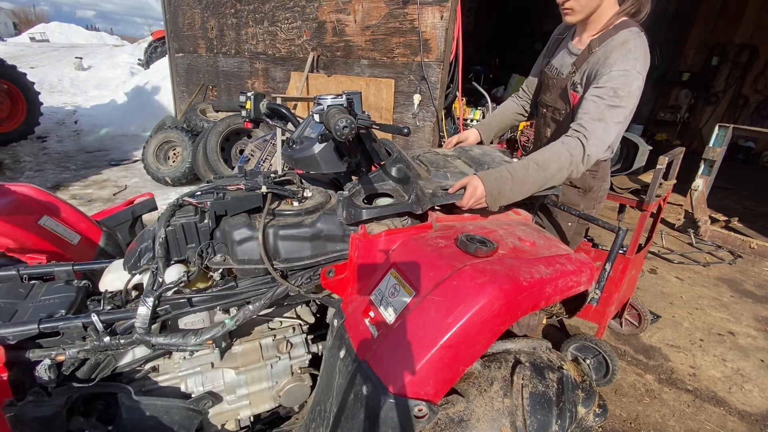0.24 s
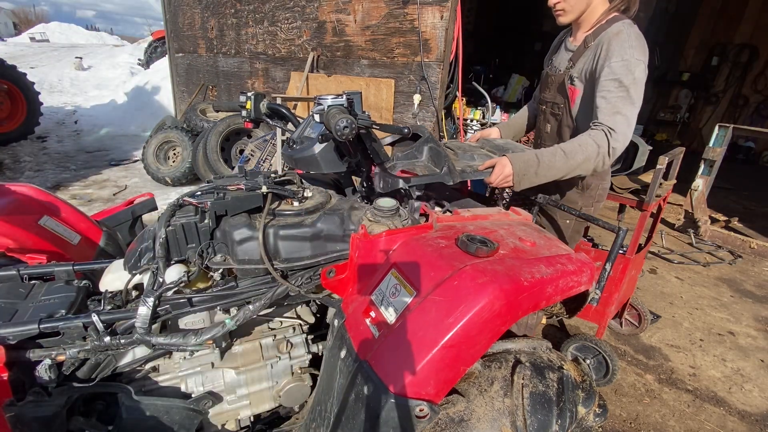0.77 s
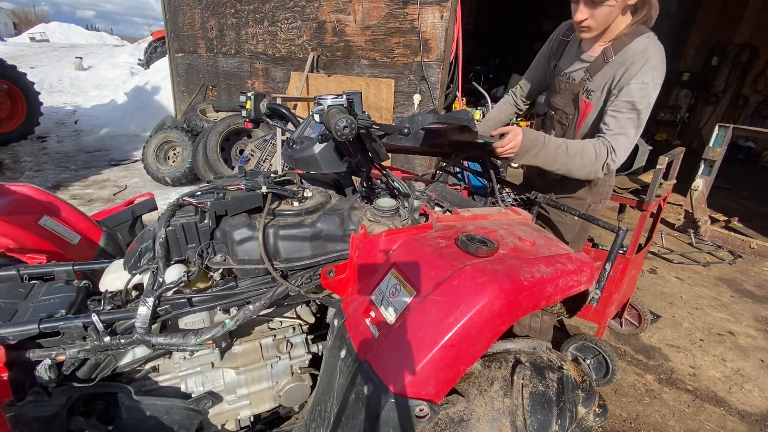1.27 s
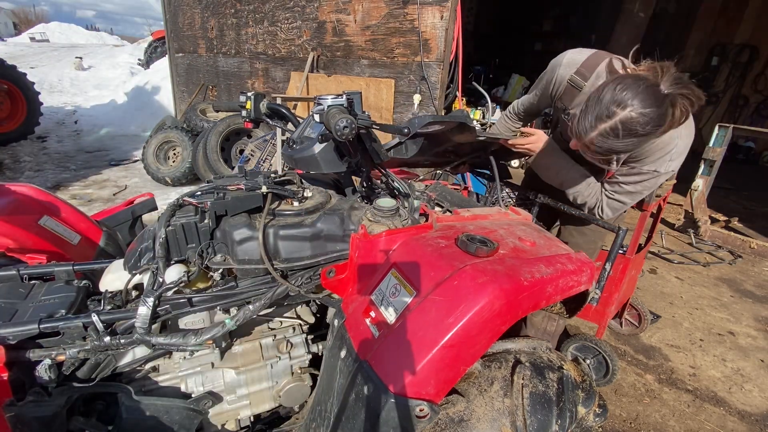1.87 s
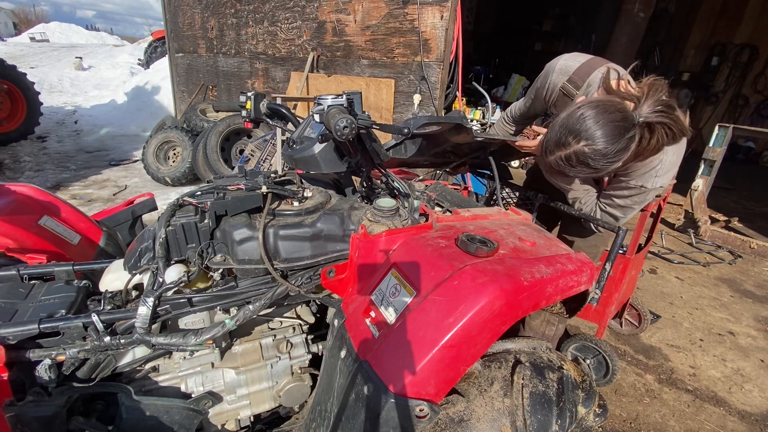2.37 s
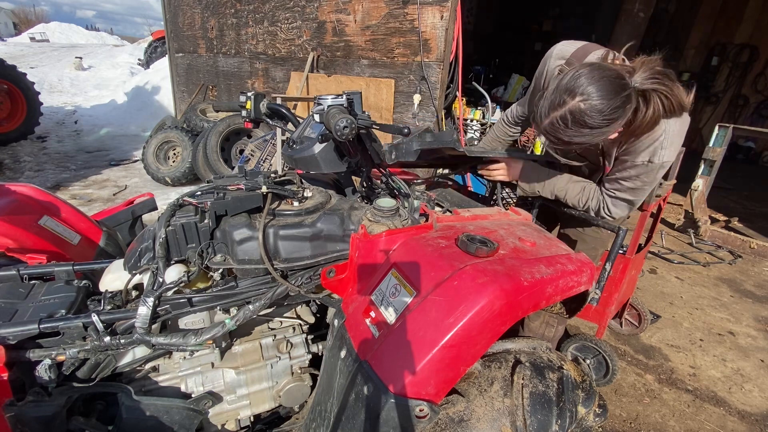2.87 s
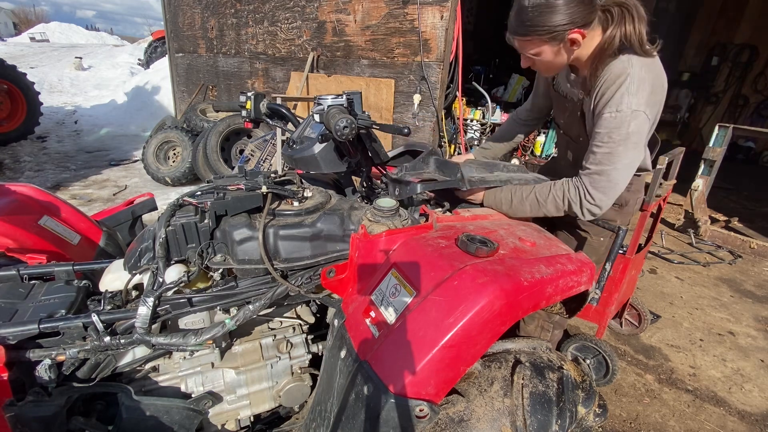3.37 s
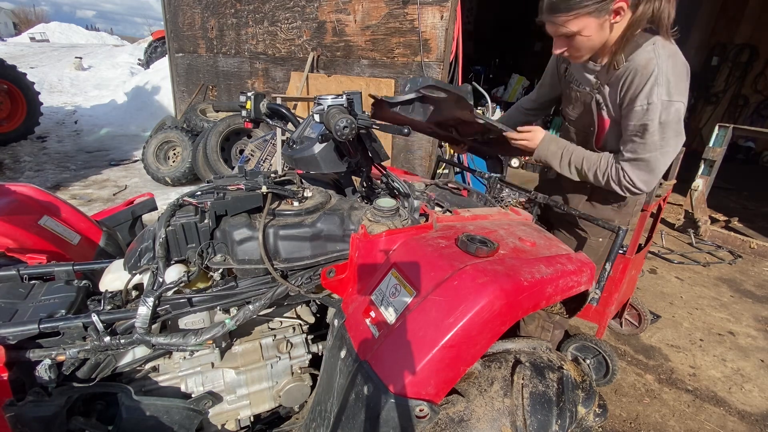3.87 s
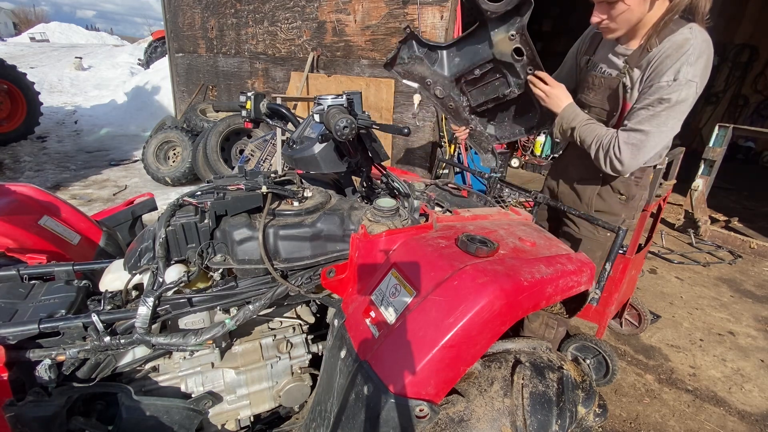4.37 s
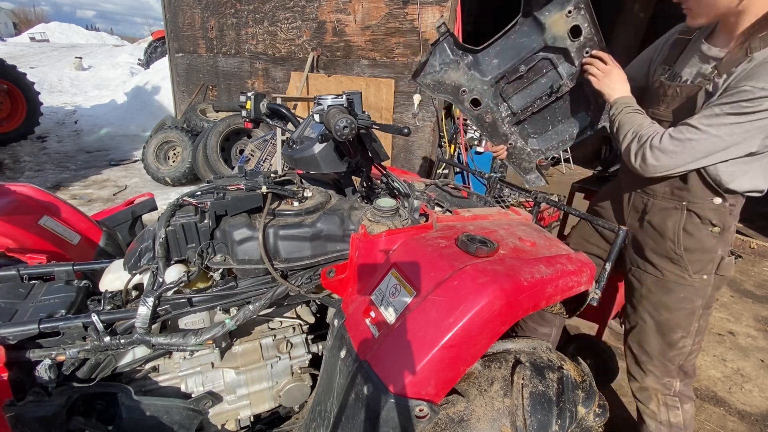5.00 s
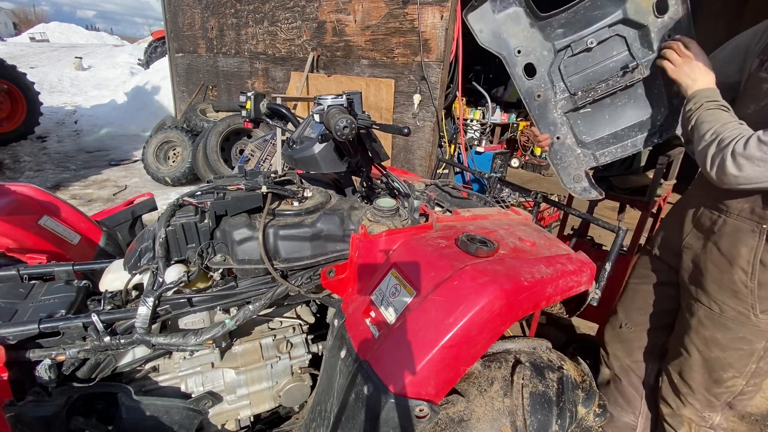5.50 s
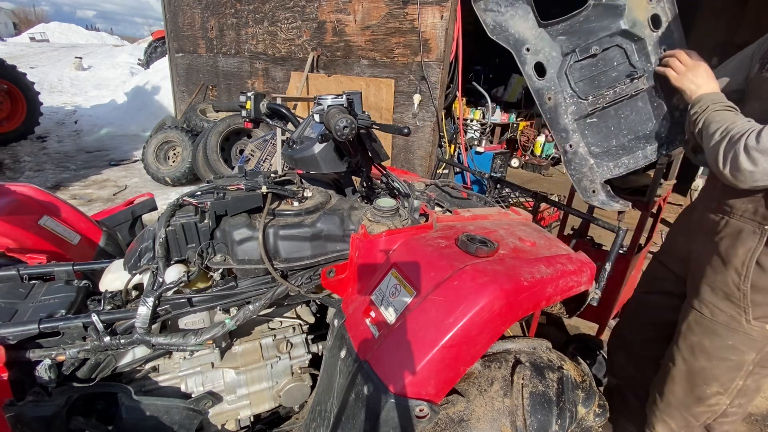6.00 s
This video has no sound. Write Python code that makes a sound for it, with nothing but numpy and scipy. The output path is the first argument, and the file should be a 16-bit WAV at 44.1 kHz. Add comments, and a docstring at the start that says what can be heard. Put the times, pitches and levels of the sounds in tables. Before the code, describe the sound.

Plastic bodywork clatters, scrapes and flexes as it is pried free, pauses, rattles again, then lifts away with sparse knocks and cloth brushes.

```python
"""A moulded plastic panel is worked loose from a quad bike and lifted away, outdoors beside an open shed.
It opens on squeaks and a swish of cloth; knocks, scrapes and thuds crowd the first 1.7 s, with a lull to 2.8 s.
A second spell of them follows; from 3.8 to 4.3 s the panel comes free, then sparser knocks and brushes remain.
Blows and drags ring its short-lived modes, bends are damped sines with noise, and cloth is dense grain noise.
Two microphone ports hear it from the side, with a faint shed echo, over a very quiet yard."""
import sys
import numpy as np
from scipy import signal
from scipy.fft import rfft, irfft
from scipy.io import wavfile
from scipy.ndimage import uniform_filter1d

SR = 44100
rng = np.random.default_rng(int(sys.argv[2]) if len(sys.argv) > 2 else 0)


def bounce(signal):
    """Save signal as a 16-bit WAV file at the path given by the first command-line argument."""
    frames = np.transpose(np.atleast_2d(signal))
    limited = np.clip(frames, -1, 1)
    pcm = np.round(limited * 32767).astype(np.int16)
    wavfile.write(sys.argv[1], SR, pcm)


N = 275625
T = np.arange(N) / SR

# hard contacts: (t/s, level at 500-2200 Hz/dB, body at 170-500 Hz relative to that/dB,
# edge above 2200 Hz relative to that/dB, ring time as a share of the panel's own, contact resonance f/Hz)
CONTACTS = [(0.093, -48.5, -2, -24, 3.6, 895), (0.172, -25, -8.5, -7.5, 0.33, 1300),
            (0.176, -30.5, -25, -22, 0.24, 546), (0.193, -37, 1.5, -7, 0.65, 513),
            (0.207, -39.5, -6, -2, 1.7, 1500), (0.339, -32.5, -11, -2.5, 1.2, 1210),
            (0.3525, -27.5, -2.5, -9.5, 0.86, 585), (0.377, -39, -25, -2, 1.3, 1520),
            (0.435, -41.5, -3, -19, 1.3, 714), (0.445, -37.5, -10, -9, 1.5, 695),
            (0.468, -42.5, -1.5, -25, 0.48, 1320), (0.601, -50, -14, 3.5, 0.78, 1900),
            (0.644, -50.5, 6.5, -10, 0.42, 1010), (0.685, -40, -14, -18, 0.44, 597),
            (0.697, -32, -3, -16, 1.9, 504), (0.796, -31, -10, -4.5, 0.74, 1110),
            (0.85, -48.5, -2, -16, 0.84, 1190), (0.957, -33.5, -9.5, -9.5, 0.67, 1040),
            (1.099, -49, -16, -20, 0.47, 730), (1.115, -43.5, 0, -8, 0.59, 740),
            (1.368, -21.5, -15, -8, 0.55, 920), (1.374, -34, 2, -9, 0.93, 460),
            (1.411, -43.5, -10, -5, 0.98, 1100), (1.539, -27, 1, -4, 0.66, 1370),
            (1.544, -29.5, -9, -16, 1, 610), (1.55, -34, -3, -9, 1.2, 650),
            (1.566, -41.5, 4, -20, 0.75, 563), (1.642, -40.5, 3, -19, 1.7, 780),
            (2.839, -42, -6, -4.5, 1.8, 1200), (2.876, -34, -6, -26, 2.2, 890),
            (2.92, -44, 2, 0, 2.3, 1400), (2.943, -39.5, -0.5, -13, 1.7, 1140),
            (3.003, -43, -2, -14, 0.74, 694), (3.154, -31.5, -16.5, -6.5, 1.05, 2820),
            (3.211, -41, -11, -14, 0.58, 1580), (3.221, -54, -13, -20, 0.27, 1270),
            (3.272, -39, -3, -15, 1, 1080), (3.287, -48, -11, -15, 0.7, 910),
            (3.395, -47.5, -6, -3, 0.42, 1480), (3.507, -50, -13, 4.5, 0.63, 3060),
            (3.567, -44, -0.5, -29, 1.5, 990), (3.702, -48, 2, -11, 1.44, 1300),
            (4.336, -60, -18, -2.5, 0.36, 1130), (4.631, -44.5, 1, -26, 1.2, 900),
            (4.717, -28.5, -4, -13.5, 0.52, 1000), (4.748, -34.5, -6.5, -16, 0.55, 1060),
            (4.939, -32.5, -9.5, -34, 1.8, 1010), (4.992, -40, -5, -11, 0.89, 1130),
            (5.0, -32.5, -14, -8, 1.1, 1610), (5.801, -46, 0.5, -10, 1.4, 700),
            (6.182, -36, -7.5, 1, 0.71, 1060)]
# spectral outline of cracking plastic: (f/Hz, level per Hz/dB)
CRACK_SPECTRUM = [(50, -12.5), (120, 5.5), (300, 5), (600, 5.5), (1300, 8), (2600, -2.5), (3800, -12),
                  (5000, -12), (5800, -26.5), (6700, -20), (11000, -40), (14000, -47.5)]


def undb(db):
    """Decibels to gain."""
    return 10 ** (np.asarray(db) / 20)


def unit(x):
    """Scale to rms 1."""
    return x / np.sqrt(np.mean(x ** 2))


def convolve(x, response):
    """Convolve along time, keeping the length of x."""
    return signal.fftconvolve(np.atleast_2d(x), np.atleast_2d(response), axes=-1)[:, :x.shape[-1]]


def colour(x, points):
    """Causal, minimum-phase filter with the given (f/Hz, level/dB) outline."""
    size = 4096
    hz, db = np.transpose(points)
    bin_hz = np.arange(size // 2 + 1) * SR / size
    log_gain = np.log(undb(np.interp(np.log(bin_hz + 1), np.log(hz), db)))
    # folding the cepstrum onto positive time makes the filter causal
    fold = 1 + np.sign(size // 2 - np.arange(size))
    fold[0] = 1
    return convolve(x, irfft(np.exp(rfft(irfft(log_gain) * fold))))


def band(x, hz, kind, order=3):
    """Butterworth filter."""
    return signal.sosfilt(signal.butter(order, hz, kind, fs=SR, output="sos"), x)


def favour(x, hz, db):
    """Lift one broad resonance."""
    peak = signal.lfilter(*signal.iirpeak(hz, 1.8, fs=SR), x)
    return x + (undb(db) - 1) * peak


def add(out, s, x):
    """Mix x into out at time s."""
    i = max(int(s * SR), 0)
    out[..., i:i + x.shape[-1]] += x[..., :N - i]


def fade(t, t60):
    """Exponential decay by 60 dB in t60 seconds."""
    return np.exp(-np.log(1000) * t / t60)


def walk(rate, size=N):
    """Smooth random wandering with a spread near 1, taking a new course rate times a second."""
    k = int(SR / rate)
    held = rng.standard_normal(size)[np.arange(size) // k]
    return uniform_filter1d(held, k)


def grains(n, per_s, spread_db):
    """Three streams of randomly timed slips; a positive spread makes a few large, a negative one a few small."""
    sizes = undb(spread_db * np.minimum(rng.exponential(size=(3, n)), 4))
    happens = rng.random((3, n)) < per_s / SR
    return unit(happens * sizes * rng.choice([-1, 1], (3, n)))


def ports(x, lag_ms, scatter_db, scatter_t60):
    """Sound reaches the left port first; nearby bodywork scatters a different burst to each port."""
    t = T[:SR // 8]
    burst = rng.standard_normal((2, len(t))) * fade(t, scatter_t60)
    response = undb(scatter_db) * unit(burst) / np.sqrt(len(t))
    response[0, 0] += 1
    response[1] += np.sinc((t - lag_ms / 1000) * SR)
    return convolve(x, response) / np.sqrt(1 + undb(2 * scatter_db))


def wide(streams, lag_ms, diffuse_db):
    """A broad source: the shared stream reaches the left port first, each port adds a stream of its own."""
    late = np.interp(T - lag_ms / 1000, T, streams[0])
    mix = np.array([streams[0], late]) + undb(diffuse_db) * streams[1:]
    return mix / np.sqrt(1 + undb(2 * diffuse_db))


def yard():
    """Still outdoor air: a quiet coloured noise whose level wanders slowly."""
    # yard noise outline: (f/Hz, level per Hz/dB)
    air_spectrum = [(30, -32), (60, -24), (100, -2.5), (200, 12.5), (400, -25.5), (1000, -2.5),
                    (2500, -9.5), (8000, -20), (12000, -26.5), (13500, -40)]
    level_db = -76
    air = unit(colour(rng.standard_normal((2, N)), air_spectrum))
    return undb(level_db) * air * undb(walk(0.56))


def shed(x):
    """A faint, dull echo from the open shed and its wall: x convolved with decaying noise."""
    t = T[:SR * 3 // 4]
    tail = rng.standard_normal((2, len(t))) * fade(t, 0.28) * (1 - fade(t, 0.0039))
    tail = colour(tail, [(100, -3.0), (900, -8.5), (3000, -8.5), (10000, -12)])
    return undb(-12.5) * convolve(x, unit(tail) / np.sqrt(len(t)))


def lifted():
    """0 while the panel lies on the machine, 1 once it is held in the air."""
    return np.clip((T - 3.8) / .5, 0, 1)


def work():
    """Working gains of rubbing and bending for every sample; each layer adds its own trim."""
    # how hard the panel is worked: (t/s, rubbing reference level/dB, bending reference level/dB)
    effort = [(0.0, -61, -101), (0.09, -56, -62), (0.36, -50, -57.5), (0.681, -54.5, -64),
              (1.18, -58.5, -57.5), (1.33, -58.5, -64), (1.39, -56, -99), (1.55, -51, -48),
              (1.81, -62, -66.5), (1.979, -76.5, -63), (2.25, -77.5, -82), (2.8, -65.5, -74),
              (2.99, -54.5, -57.5), (3.1, -55.5, -54), (3.52, -61.5, -56.5), (3.63, -70.5, -60.5),
              (3.74, -52.5, -60), (4.23, -83.5, -75.5), (4.53, -59, -92), (4.63, -58, -82),
              (5.12, -69, -73.5), (5.61, -76, -101), (5.71, -79, -70), (5.99, -62, -77), (6.25, -85, -92)]
    s, rub_db, bend_db = np.transpose(effort)
    return undb(np.interp(T, s, rub_db)), undb(np.interp(T, s, bend_db))


def clothes():
    """Coarse fibres brush past each other; every sweep swells and falls away, over a faint rustle."""
    # a sleeve or trouser leg sweeps past: (middle t/s, length/s, level/dB, sheen above 6 kHz relative/dB)
    sweeps = [(0.0, 0.053, -57.5, -11), (0.244, 0.32, -61.5, -2), (0.432, 0.14, -68, 1),
              (0.627, 0.18, -62, 0), (0.746, 0.064, -62.5, 1.5), (0.956, 0.019, -47.5, -10),
              (1.11, 0.098, -59.5, -2), (1.219, 0.074, -61, 0), (1.473, 0.28, -58.5, 2),
              (1.704, 0.34, -67, -3), (2.343, 0.4, -61, -0.5), (2.622, 0.28, -76, -7),
              (2.78, 0.1, -58, -0.5), (2.86, 0.17, -57, 0), (2.923, 0.1, -54, -3.5),
              (2.986, 0.051, -55.5, -6), (3.086, 0.14, -56, 4), (3.198, 0.34, -58, 0),
              (3.501, 0.28, -62.5, 1), (3.654, 0.066, -61.5, -9), (3.718, 0.067, -57, 1),
              (3.75, 0.094, -58.5, 2.5), (3.838, 0.31, -69.5, 1), (4.07, 0.42, -69, -3),
              (4.371, 0.12, -76, 1), (4.57, 0.19, -57, -5.5), (4.71, 0.21, -61, -6),
              (4.988, 0.24, -62, -1.5), (5.338, 0.17, -70.5, -3.5), (5.5, 0.062, -58.5, 0),
              (5.543, 0.08, -60.5, 3), (5.764, 0.37, -64.5, 4), (5.952, 0.11, -54, -5),
              (6.085, 0.4, -51, 0), (6.197, 0.44, -55.5, 0)]
    # cloth outline: (f/Hz, level per Hz/dB)
    cloth_spectrum = [(50, -30.5), (130, 1), (300, 0.5), (1100, 4.5), (2000, -3), (3200, 1.5), (4800, 2.5),
                      (5700, -6), (6700, 2.5), (7700, -8), (8400, -0.5), (10800, -4), (12300, -10),
                      (13400, -33.5), (15500, -19)]
    rustle_db = -16.5  # clothes stir with the work, relative to the rubbing reference
    edge_db = -28.5  # level half a length from the middle of a sweep, against its middle
    power = np.tile((work()[0] * undb(rustle_db)) ** 2, (2, 1))
    for s, length, db, sheen_db in sweeps:
        near = np.abs(T - s) < length
        sweep_db = db + edge_db * (2 * (T[near] - s) / length) ** 2
        power[:, near] += undb([sweep_db, sweep_db + sheen_db]) ** 2
    fibres = grains(N, per_s=4500, spread_db=3.3) * undb(2.5 * walk(80))
    cloth = unit(colour(fibres, cloth_spectrum))
    dull = band(cloth, 6000, "low") * np.sqrt(power[0])
    sheen = band(cloth, 6000, "high") * np.sqrt(power[1])
    swish = dull + sheen
    return swish[1:] + ports(swish[0], lag_ms=0.0048, scatter_db=11.0, scatter_t60=0.046)


def frame_ring():
    """A bumped steel part sings on faintly and unevenly; its upper mode dies first."""
    # bumps on the steel frame: (t/s, level/dB, f/Hz of the part that is hit, ring time t60/s)
    bumps = [(1.55, -47, 721, 0.49), (4.717, -78, 1040, .7), (4.94, -67, 840, 1.96)]
    modes = [(1, 0, 1), (3.2, -15, 0.42)]  # (pitch ratio, level/dB, share of the ring time)
    out, t = np.zeros(N), T[:SR]
    for s, db, hz, t60 in bumps:
        for ratio, mode_db, share in modes:
            phase = 2 * np.pi * hz * ratio * t
            shimmer = walk(60, size=SR) * np.sin(phase) + walk(60, size=SR) * np.cos(phase)
            add(out, s, undb(db + mode_db) * fade(t, t60 * share) * shimmer)
    return out


def ticks():
    """Grit snaps under an edge as short bright noise, too lightly to ring the panel."""
    # tiny bright ticks of grit on the plastic: (t/s, peak level/dB)
    grit_snaps = [(0.614, -46), (0.793, -50), (1.278, -48.5), (2.835, -49), (3.511, -47), (3.701, -51),
                  (4.794, -45), (5.043, -61)]
    out, t = np.zeros(N), T[:SR // 20]
    for s, db in grit_snaps:
        snap = band(rng.standard_normal(len(t)), [3000, 10000], "band") * fade(t, 0.018)
        add(out, s, undb(db) * snap / np.abs(snap).max())
    return ports(out, lag_ms=.2, scatter_db=-4, scatter_t60=.02)


def crackle():
    """Dust under the sliding edge breaks in tiny, separate snaps until the panel is lifted."""
    # dust outline: (f/Hz, level per Hz/dB)
    dust_spectrum = [(300, -20), (900, 5), (2600, 1), (4800, -1.5), (5800, -14.5), (7000, -10),
                     (11000, -24), (14000, -35)]
    level_db = -12.5  # relative to the rubbing reference
    snaps = unit(colour(grains(N, per_s=220, spread_db=2.5), dust_spectrum))
    return wide(snaps * work()[0] * undb(level_db) * (1 - lifted()), lag_ms=0.14, diffuse_db=-6)


def chatter():
    """Loose edges tick against the frame at random while the panel still lies on it."""
    level_db = -8.5  # relative to the rubbing reference
    taps = unit(colour(grains(N, per_s=45, spread_db=-5.5), CRACK_SPECTRUM))
    return wide(taps * work()[0] * undb(level_db) * (1 - lifted()), lag_ms=0.41, diffuse_db=12.5)


def squeaks():
    """An edge's slips fall into a brief rhythm, heard as a tone, some steady and some wavering."""
    # squeaking edge: (t/s, length/s, start f/Hz, end f/Hz, level/dB, waver as a share of the pitch)
    squeak_table = [(0.0, 0.071, 3910, 3930, -64, 0.011), (0.0, 0.08, 4250, 4450, -68, 0.017),
                    (0.0, 0.06, 3570, 3570, -84, 0.011), (0.0, 0.21, 487, 463, -55, 0.052),
                    (0.266, 0.045, 3200, 3180, -54, .004), (0.262, 0.044, 4270, 4080, -57, 0.0061),
                    (3.193, 0.049, 762, 753, -45, .015), (3.2, 0.032, 1546, 1395, -41, 0.04),
                    (3.338, 0.072, 1143, 1185, -51.5, 0.015), (3.32, 0.048, 1564, 1800, -60, .012),
                    (3.482, 0.049, 1210, 1260, -52.5, .015), (5.929, 0.055, 1250, 1290, -52, 0.06),
                    (6.052, 0.049, 1140, 996, -55, 0.026)]
    out = np.zeros(N)
    for s, length, start_hz, end_hz, db, waver in squeak_table:
        n = int(length * SR)
        hz = np.linspace(start_hz, end_hz, n) * (1 + waver * walk(500, size=SR)[:n])
        grip = np.hanning(n) ** .5 * undb(3 * walk(150, size=SR)[:n])
        add(out, s, undb(db) * grip * np.sin(2 * np.pi * np.cumsum(hz) / SR))
    return ports(out, lag_ms=.04, scatter_db=-8, scatter_t60=.03)


def flexing():
    """The sheet gives way in soft, heavily damped thuds and rumbles under the hands."""
    # thuds of the flexing sheet: (t/s, peak level/dB, f/Hz)
    thuds = [(0.171, -47, 85), (0.232, -39, 190), (0.282, -32, 360), (0.568, -42, 234), (0.696, -43, 74),
             (0.861, -40.5, 115), (1.072, -38.5, 85), (1.098, -45.5, 171), (1.154, -35.5, 84),
             (1.304, -37.5, 117), (1.338, -36.5, 183.5), (1.549, -33, 244), (1.6, -40, 127),
             (1.685, -34.5, 193), (1.728, -42.5, 148), (1.93, -48.5, 105), (2.027, -52, 130),
             (2.086, -43.5, 220), (2.239, -53.5, 135), (2.43, -49.5, 121), (3.004, -37.5, 239),
             (3.23, -37, 173), (3.285, -34, 318), (3.312, -34.5, 282), (3.413, -41, 208), (3.554, -39, 262),
             (3.584, -39, 286), (3.674, -39.5, 162), (3.747, -43, 310), (3.886, -47, 202),
             (4.107, -52, 156), (4.217, -59, 152), (4.248, -51, 143), (4.281, -64.5, 186),
             (4.298, -50, 287), (5.687, -64, 161), (5.83, -58, 173), (6.182, -41, 206)]
    # rumble outline: (f/Hz, level per Hz/dB)
    rumble_spectrum = [(25, -35.5), (45, -14), (75, 4.5), (130, 6), (240, 0), (350, -22), (600, -34),
                       (2000, -55)]
    rise_cycles, thud_t60, shudder_db = 5.4, 0.079, -3  # a low bend takes longer to swell than a high one
    shift_rad, shift_hz = 2.2, 101  # ports are this far out of step at this pitch, less at higher ones
    rumble_db = -2.5  # relative to the bending reference
    out, t = np.zeros((2, N)), T[:SR // 6]
    for s, db, hz in thuds:
        # one bending mode leads, its crowded neighbours shudder along
        shudder = unit(band(rng.standard_normal((2, len(t))), [hz * .6, hz * 1.9], "band", order=2))
        lag_rad = np.array([[0], [shift_rad * shift_hz / hz]])
        mode = np.sin(2 * np.pi * hz * t - lag_rad)
        swell = (1 - fade(t, rise_cycles / hz)) ** 2 * fade(t, thud_t60)
        swing = swell * (mode + undb(shudder_db) * shudder)
        add(out, s, undb(db) * swing / np.abs(swing).max())
    rumble = unit(colour(grains(N, per_s=55, spread_db=3.0), rumble_spectrum))
    return out + wide(rumble * work()[1] * undb(rumble_db), lag_ms=0.74, diffuse_db=12.0)


def panel_ring(share):
    """The panel's modes as decaying sines; contact and grip shift their weights and pitches at random."""
    # modes before those shifts: (f/Hz, level/dB, t60/s for a share of 1)
    modes = [(255.7, -4, 0.086), (349, -3.5, 0.088), (441.3, -0.5, 0.054), (542, -3, 0.06),
             (648, -3, 0.058), (726, -10, 0.18), (937, -7.5, 0.14), (1094, -0.5, 0.048),
             (1290, -4.5, 0.065), (1537, 4.5, 0.023), (1735, -11, 0.15), (2580, 0, 0.0088),
             (2995, -13.5, 0.064), (4230, -25, 0.067)]
    t = T[:SR // 4]
    hz, db, t60 = np.transpose(modes)[:, :, None]
    weight, detune, side = rng.standard_normal((3, len(modes), 1))
    waves = np.sin(2 * np.pi * hz * (1 + 0.025 * detune) * t)
    gain = np.sign(side) * undb(db + 0.92 * weight)
    return np.sum(gain * waves * fade(t, t60 * share), axis=0)


def rubbing(n):
    """Dusty edges stick and slip in uneven runs, shaking the panel; its ring shifts as the contact moves."""
    # gritty contact outline: (f/Hz, level per Hz/dB)
    grit_spectrum = [(50, -45), (130, -2), (270, 7.5), (500, 6), (790, 5), (1100, -15), (1700, -8),
                     (2500, -12.5), (4500, -23.5), (6000, -39), (12000, -63.5)]
    slips = grains(n, per_s=800, spread_db=3.7) * undb(3 * walk(70, size=n))
    # the moving point of contact wanders between two sets of mode weights
    place = walk(7, size=N)[:n] * np.pi / 2
    ring_a = convolve(slips, panel_ring(.65))
    ring_b = convolve(slips, panel_ring(.65))
    ring = np.cos(place) * ring_a + np.sin(place) * ring_b
    return unit(unit(colour(slips, grit_spectrum)) + unit(ring))


def scrape():
    """Each drag, and the skid after each blow, catches and lets go; light rubbing goes on between."""
    # single drags over frame and overalls: (t/s, length/s, level below 2200 Hz at full force/dB,
    # brightness above 2200 Hz relative to that/dB, contact resonance f/Hz)
    drags = [(0, 0.015, -44.5, -11.5, 494), (0.153, 0.048, -41.5, -7, 950), (0.265, 0.034, -48, -5.5, 3320),
             (0.43, 0.046, -42, -15, 736), (0.5, 0.081, -48.5, -4, 1210), (0.586, 0.042, -47.5, -5, 1100),
             (0.672, 0.014, -49.5, -4, 516), (0.739, 0.025, -43.5, -12, 487),
             (0.829, 0.12, -55, -4.5, 1040), (1.12, 0.018, -45.5, -16, 890), (1.2, 0.03, -47.5, -10, 1040),
             (1.459, 0.088, -49.5, -10.5, 900), (1.512, 0.025, -48, -10, 960),
             (1.63, 0.023, -44, -15.5, 353), (2.06, 0.071, -66, -10.5, 980), (2.26, 0.069, -71, 8.5, 1100),
             (2.76, 0.087, -57, -13, 890), (2.895, 0.034, -46, -11, 990), (2.984, 0.03, -45.5, -24, 720),
             (3.075, 0.075, -47.5, -33, 970), (3.185, 0.023, -44.5, -5.5, 2750),
             (3.266, 0.021, -42.5, -18.5, 270), (3.389, 0.085, -55.5, -10, 1240),
             (3.465, 0.058, -52.5, -9, 3030), (3.7, 0.04, -49.5, -15, 484), (3.82, 0.042, -64, 0, 810),
             (4.04, 0.12, -63.5, -9, 1000), (4.475, 0.18, -51.5, -32, 1100),
             (4.636, 0.07, -50.5, -23, 1180), (4.935, 0.051, -43.5, -26, 503),
             (4.988, 0.022, -39.5, -9.5, 1830), (5.275, 0.081, -55, -8.5, 820),
             (5.46, 0.051, -55.5, -8.5, 296), (5.655, 0.16, -57.5, -2, 4330),
             (5.893, 0.056, -46.5, -13.5, 1140), (6.031, 0.07, -59, 3, 2550),
             (6.171, 0.014, -47.5, -2.5, 2500)]
    rub_db = -3.5  # relative to the rubbing reference
    skid_delay_s, skid_s, skid_db, skid_bright_db = .012, 0.023, -58, -22
    blow_db, skid_growth = -36, 0.3  # skid_db holds for this blow and grows by this many dB per dB of blow
    # rise time as a share of length: quick on the machine, slow in the air where it only brushes overalls
    attack_share, free_attack_share = 0.2, 0.98
    release_t60 = 0.15
    out, t = rubbing(N) * work()[0] * undb(rub_db), T[:SR // 3]
    skids = [(s + skid_delay_s, skid_s, skid_db + skid_growth * (db - blow_db), skid_bright_db, hz)
             for s, db, *_, hz in CONTACTS]
    for s, length, db, bright_db, hz in list(drags) + skids:
        slips = favour(rubbing(len(t)), hz, db=7.5)
        dull = unit(band(slips, 2200, "low"))
        sharp = unit(band(slips, 2200, "high"))
        rise_s = length * np.interp(s, [3.8, 4.3], [attack_share, free_attack_share])
        release = fade(np.maximum(t - length, 0), release_t60)
        force = undb(db) * (1 - fade(t, rise_s)) ** 2 * release
        add(out, s, force * (dull + undb(bright_db) * sharp))
    # once lifted clear of the bodywork the panel is heard directly, and more from the side
    resting = wide(out, lag_ms=0.19, diffuse_db=1.0)
    free = wide(out, lag_ms=0.25, diffuse_db=-5.0)
    return (1 - lifted()) * resting + lifted() * free


def knocks():
    """Each blow rings the panel and cracks its dense upper modes; contact hardness sets body and edge."""
    out, t = np.zeros((2, N)), T[:SR // 4]
    for s, db, body_db, edge_db, share, hz in CONTACTS:
        share = max(share, .25)  # shortest ring allowed
        # the contact itself snaps for a few milliseconds before the dense modes take over
        snap = fade(t, 0.049 * share) + undb(8.0) * fade(t, 0.0073)
        crack = colour(rng.standard_normal(len(t)) * snap, CRACK_SPECTRUM)
        blow = favour(unit(panel_ring(share)) + undb(1.5) * unit(crack), hz, db=13.5)
        # later blows land further to the side, so the lag between the ports grows
        lag_ms = np.interp(s, [.8, 1.4, 4.7], [.04, .15, .24])
        blow = ports(blow, lag_ms, scatter_db=-1.0, scatter_t60=0.041)
        body = band(blow, [170, 500], "band")
        middle = band(blow, [500, 2200], "band")
        edge = band(blow, 2200, "high")
        for part, part_db in (body, db + body_db), (middle, db), (edge, db + edge_db):
            # each band's level is that of its loudest 4 ms
            loudest = np.sqrt(uniform_filter1d(np.mean(part ** 2, axis=0), size=180).max())
            add(out, s, part * undb(part_db) / loudest)
    return out


def scene():
    """Handling sounds, their echo and the yard."""
    # how the panel's sound changes once nothing presses on it: (f/Hz, level/dB)
    freed = [(130, -7), (230, -8.5), (370, 1), (520, -2.5), (760, -5.5), (1080, 0.5), (1450, -5),
             (1850, 0.5), (2400, -3.5), (4500, 8)]
    panel = knocks() + scrape() + chatter()
    panel = (1 - lifted()) * panel + lifted() * colour(panel, freed)
    near = panel + crackle() + ticks() + squeaks() + flexing() + clothes() + frame_ring()
    return near + shed(near) + yard()


def record(dry):
    """The ports differ in tone, the right one brighter at the top; deep bass and the extreme top are cut."""
    left = colour(dry[0], [(150, 4.0), (380, -3.5), (1200, -0.5), (2400, -1.0),
                           (4500, 1.5), (8000, -3.0), (13000, -7.0)])
    right = colour(dry[1], [(150, 3.0), (380, -2.1), (1200, -4.0), (2400, -1.5),
                            (4500, -2.5), (8000, 3.0), (13000, -2.5)])
    bass_cut = band(np.vstack([left, right]), 50, "high")
    top_hz = 15700
    return signal.sosfilt(signal.ellip(8, .2, 70, top_hz, fs=SR, output="sos"), bass_cut)


dry = scene()
out = record(dry)
bounce(out)
```